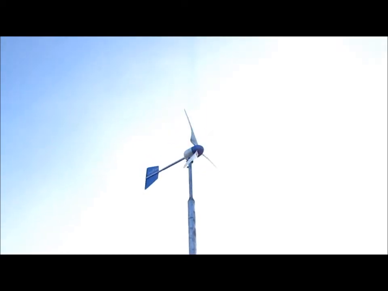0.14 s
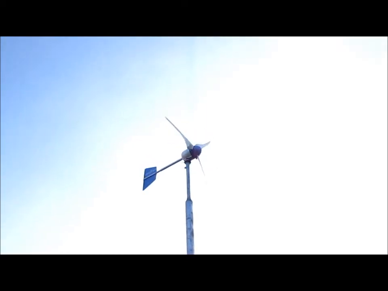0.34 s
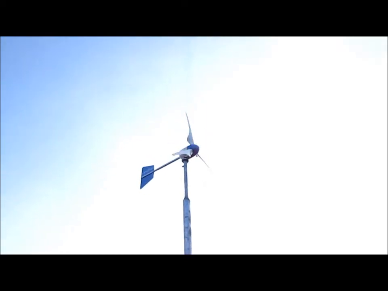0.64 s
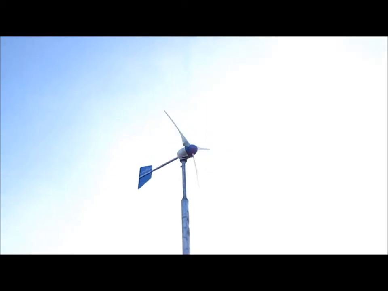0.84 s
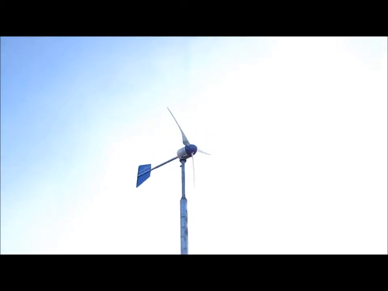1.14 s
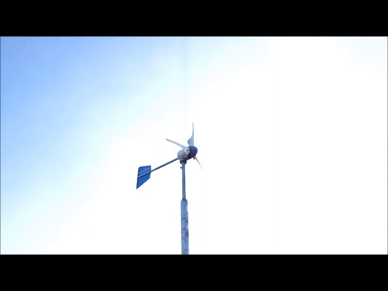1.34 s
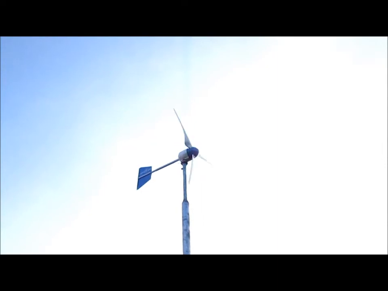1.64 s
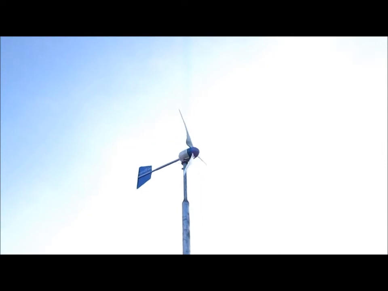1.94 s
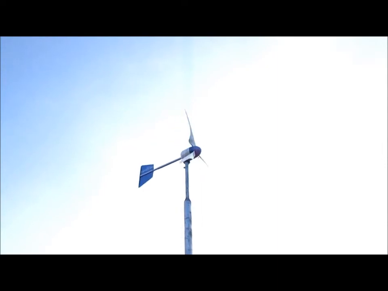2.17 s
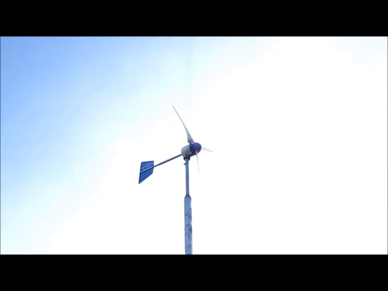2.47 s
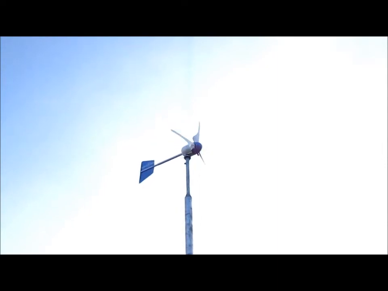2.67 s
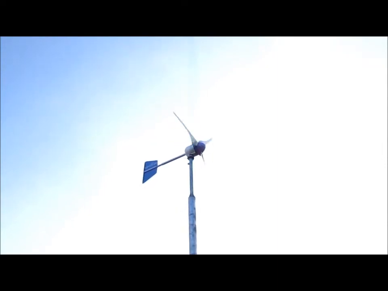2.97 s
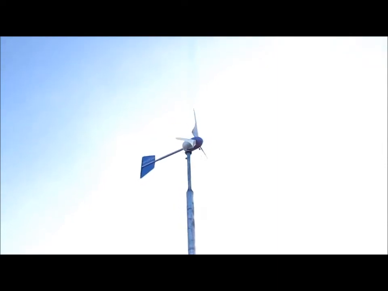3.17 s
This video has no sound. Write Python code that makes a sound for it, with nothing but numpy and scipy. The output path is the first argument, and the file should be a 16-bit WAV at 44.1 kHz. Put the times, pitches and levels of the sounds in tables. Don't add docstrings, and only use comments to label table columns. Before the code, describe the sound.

Gusty wind rumble batters an exposed microphone, with sharp slaps, small cracks and airy whoosh.

```python
import sys
import numpy as np
from scipy import signal
from scipy.fft import rfft, irfft, next_fast_len
from scipy.io import wavfile
from scipy.ndimage import uniform_filter1d, minimum_filter1d, map_coordinates

SR = 44100
rng = np.random.default_rng(int(sys.argv[2]) if len(sys.argv) > 2 else 0)


def voltage_ratio(level):
    return 10 ** (np.asarray(level, float) / 20)


def to_wav(s):
    ch = np.atleast_2d(s).T
    pcm = np.round(np.clip(ch, -1, 1) * 32767)
    wavfile.write(sys.argv[1], SR, pcm.astype(np.int16))


N = 145971

# time in seconds, level in dB, small eddies relative to large in dB,
# pitch of the small eddies in Hz.
GUSTS = [(0, -20.5, -7, 445), (.2, -20.5, -9, 560), (.4, -19.5, -11.5, 474), (.6, -16.5, -17, 417),
         (.8, -16.5, -17.5, 428), (.97, -19, -13, 457), (1.1, -16, -25, 421), (1.25, -19.5, -12.5, 438),
         (1.5, -16, -24.5, 451), (1.7, -13, -28, 415), (1.9, -17, -16.5, 476), (2.15, -17.5, -15, 393),
         (2.4, -15.5, -28, 378), (2.54, -12, -14, 493), (2.645, -21, -9, 800), (2.75, -19.5, -12.5, 560),
         (3.05, -17.5, -30, 370), (3.31, -19, -20.5, 440)]
# time in seconds, peak in dB, gain drop in dB
KICKS = [(0.0945, -25.5, 3.5), (0.157, -27.5, 0), (0.243, -31, -0.5), (0.3835, -27.5, -0.5),
         (0.4516, -26, 1.5), (0.7063, -33, 5), (0.867, -29, 4), (0.918, -39, 2), (0.9428, -33, 7),
         (1.202, -28, 2), (1.241, -25, 6), (1.346, -24, 2.5), (1.421, -41, -2.5), (1.459, -25.5, 1),
         (1.51, -37, 2.5), (1.5847, -26, 7.5), (1.8287, -25, 12), (1.8598, -25.5, -3), (2.3595, -17, 11),
         (2.5569, -14, 8), (2.6159, -30, 1.5), (2.725, -36, -1), (2.7585, -29, 4), (2.798, -18, 5.5),
         (3.025, -42, 1.5), (3.065, -26, 8), (3.2081, -25.5, 7.5)]
KICK_LATE_S = 0.0004


def unit(x):
    return x / np.sqrt(np.mean(x ** 2))


def walk(rate_hz):
    hold = int(SR / rate_hz)
    steps = np.repeat(rng.standard_normal(N // hold + 1), hold)
    smooth = uniform_filter1d(uniform_filter1d(steps, hold), hold)
    return unit(smooth[:N])


def shaped(gain, size):
    hz = np.arange(size // 2 + 1) * SR / size + 1e-3
    spectrum = rfft(rng.standard_normal(size)) * gain(hz)
    return unit(irfft(spectrum, size))


def swing_envelope(c, cycles):
    front_share = 0.4
    return np.exp(-(c / (cycles * np.where(c < 0, front_share, 1))) ** 2)


def whoosh(t):
    # frequency in Hz, density in dB per Hz.
    colour = [(880, -44.5), (1500, -10), (2070, -3.5), (2750, 1), (4190, -4.5), (4520, -2.5), (6330, -12.5),
              (9000, -27), (11700, -67)]
    # time in seconds, level in dB.
    swells = [(0, -49.5), (.15, -49.5), (.27, -55.5), (.37, -53.5), (.47, -54.5), (.62, -52), (.72, -54.5),
              (.85, -50.5), (.97, -47), (1.15, -47), (1.45, -51), (1.75, -48.5), (2.0, -53.5), (2.25, -50),
              (2.5, -46.5), (2.75, -55), (3.0, -49.5), (3.31, -47)]
    hz, db = np.array(colour).T
    low_db = -22.5

    def gain(f):
        level_db = np.interp(np.log(f), np.log(hz), db) + low_db * (f < hz[0])
        return voltage_ratio(level_db) * (f > 200) * (f < hz[-1])

    air = shaped(gain, size=next_fast_len(N))[:N]
    level_db = np.interp(t, *np.array(swells).T) + 0.8 * walk(9.0)
    return air * voltage_ratio(level_db)


def gain_db(t):
    start_drop_db, recover_s = 13, 0.16
    total_drop_db = np.zeros(N)
    for start, _, drop_db in [(0, 0, start_drop_db)] + list(KICKS):
        recovery = np.exp(-np.maximum(t - start, 0) / recover_s)
        total_drop_db += drop_db * (t > start + KICK_LATE_S) * recovery
    return -total_drop_db


def edge_pressure(t):
    # centre in seconds, pressure relative to full scale, half length in seconds.
    edge_swings = [
        (.0003, -.115, .0012),
        (3.31, -.27, .003),
    ]
    return sum(size * np.exp(-((t - centre) / half) ** 2) for centre, size, half in edge_swings)


def cracks(t):
    swing_hz, decay_s, level_db = 1370, 0.0002, 7
    out = np.zeros(N)
    for start, db, _ in KICKS:
        d = t - start - KICK_LATE_S
        corner_s = 0.00004 * voltage_ratio(-0.6 * (db + 20))
        envelope = np.exp(-np.hypot(d, corner_s) / decay_s)
        out += voltage_ratio(db + level_db) * envelope * np.cos(2 * np.pi * swing_hz * d - 1)
    return out


def gliding_swing(c):
    glide = -0.33
    turn = rng.random()
    return np.sin(2 * np.pi * (c + glide * c * np.tanh(c) / 2 + turn))


def slaps(t):
    # time in seconds, peak in dB, pitch in Hz.
    early_slaps = [(0.032, -14, 506), (0.07, -23, 474), (0.081, -14, 401), (0.112, -23, 441),
                   (0.139, -15, 479), (0.203, -28, 401), (0.202, -15.5, 396), (0.254, -12, 405),
                   (0.276, -27, 401), (0.32, -27.5, 480), (0.342, -24, 431), (0.354, -15.5, 401),
                   (0.367, -20.5, 584), (0.38, -15.5, 401), (0.409, -15, 607), (0.449, -25, 420),
                   (0.475, -19, 538), (0.513, -28, 560), (0.542, -13, 430), (0.569, -22, 390),
                   (0.57, -14.5, 540), (0.603, -18.5, 540), (0.637, -36, 401), (0.651, -15.5, 401),
                   (0.692, -21, 506), (0.705, -18, 570), (0.744, -19, 440), (0.79, -22, 393),
                   (0.809, -15, 730), (0.819, -15, 450), (0.865, -13, 401), (0.876, -24, 646),
                   (0.898, -18.5, 589), (0.918, -17, 581), (0.942, -13, 387), (0.962, -23.5, 416),
                   (0.989, -16, 397), (1.003, -18, 510), (1.055, -21.5, 433), (1.08, -17, 482),
                   (1.168, -20, 439), (1.193, -8.5, 445), (1.209, -9, 401), (1.238, -16, 420),
                   (1.283, -11.5, 525), (1.3, -17, 501), (1.343, -10.5, 646), (1.365, -24, 436),
                   (1.406, -23.5, 526), (1.423, -24.5, 471), (1.436, -18, 400), (1.458, -10, 404),
                   (1.509, -16.5, 401), (1.526, -22, 700), (1.542, -10, 487), (1.58, -16.5, 522),
                   (1.617, -21.5, 415), (1.671, -32, 530)]
    # time in seconds, peak in dB, pitch in Hz.
    later_slaps = [(1.671, -30, 404), (1.696, -16, 540), (1.721, -8.5, 520), (1.764, -16, 401),
                   (1.793, -14, 401), (1.829, -13, 408), (1.857, -4, 598), (1.897, -18.5, 401),
                   (1.898, -21, 401), (1.916, -21, 401), (1.945, -16, 730), (1.957, -25, 498),
                   (1.984, -21, 458), (2.004, -3, 401), (2.013, -17.5, 546), (2.077, -16.5, 444),
                   (2.11, -10.5, 413), (2.185, -15, 470), (2.234, -16, 455), (2.271, -27, 436),
                   (2.288, -18, 446), (2.31, -30, 397), (2.345, -22, 398), (2.351, -10.5, 401),
                   (2.358, -10, 406), (2.407, -23.5, 401), (2.435, -20, 401), (2.486, -26, 400),
                   (2.49, -20.5, 453), (2.511, -20, 474), (2.517, -27, 730), (2.553, 4, 538),
                   (2.594, -20, 401), (2.654, -14, 463), (2.7, -20, 455), (2.736, -13.5, 400),
                   (2.756, -12, 401), (2.781, -19, 396), (2.795, -15, 517), (2.839, -17, 401),
                   (2.856, -18, 560), (2.863, -17, 460), (2.897, -14, 401), (2.921, -21, 590),
                   (2.947, -20, 440), (2.973, -28, 401), (2.993, -35, 404), (3.009, -22, 436),
                   (3.026, -15, 610), (3.063, -15.5, 464), (3.083, -19, 452), (3.169, -24, 401),
                   (3.176, -19, 440), (3.203, -23, 430), (3.231, -7, 401), (3.25, -14.5, 605),
                   (3.289, -23, 400), (3.289, -16.5, 560)]
    # centre in seconds, peak in dB, pitch in Hz, half length in cycles.
    trains = [(1.196, -7, 340, 2), (1.302, -9.5, 810, 0.75), (1.346, -15, 724, 1.34), (1.462, -9, 750, 1.1),
              (1.582, -13.5, 530, 1.4), (2.08, -12, 850, 0.42), (2.189, -15, 474, 0.87),
              (2.296, -12, 268, 0.95), (2.3492, -26, 426, 1.6), (2.3593, -7, 980, 1.26),
              (2.61, -18.5, 1070, 0.69), (2.584, -15, 850, 1.4), (2.665, -19.5, 1150, 1.6),
              (2.711, -27, 885, 0.88), (3.184, -13.5, 301, 2.8), (3.205, -12, 820, 0.92),
              (3.253, -15.5, 584, 3.1)]
    late_s, slap_cycles, slap_db = 0.0019, 0.73, 6.5
    out = np.zeros(N)
    for start, db, hz in list(early_slaps) + list(later_slaps):
        c = (t - start - late_s) * hz
        out += voltage_ratio(db + slap_db) * swing_envelope(c, slap_cycles) * gliding_swing(c)
    for centre, db, hz, cycles in trains:
        c = (t - centre) * hz
        out += voltage_ratio(db) * np.exp(-(c / cycles) ** 2) * gliding_swing(c)
    return out


def small_eddies():
    per_s, half = 330, 300
    pitch_oct, cycles, scatter_db = 0.73, 0.72, 3.5
    clump_db, level_db = 4, 8
    count = int(per_s * N / SR)
    when, turn, size, pitch = rng.random((count, 4)).T[:, :, None]
    gust_s, _, _, gust_hz = np.array(GUSTS).T
    hz = np.interp(when * N / SR, gust_s, gust_hz) * 2 ** (pitch_oct * (2 * pitch - 1))
    c = np.arange(-half, half) / SR * hz
    strength = voltage_ratio(-scatter_db * np.log(1 - size))
    swings = strength * swing_envelope(c, cycles) * np.sin(2 * np.pi * (c + turn))
    place = (when * N).astype(int) + np.arange(2 * half)
    out = np.bincount(place.ravel(), swings.ravel(), N + 2 * half)[half:N + half]
    return unit(out * voltage_ratio(clump_db * walk(70.0))) * voltage_ratio(level_db)


def large_eddies():
    eddy_hz, slope, knee = 192.5, 2.8, 0.29
    db_per_oct, patchy_db, level_db = 3.5, 0.5, -1.5
    mic_cut_hz = 73

    def gain(f):
        ratio = f / eddy_hz
        return ratio ** knee / (1 + ratio ** (2 * slope)) ** 0.5

    speed_oct = 0.17 * walk(45.0) + 0.36 * walk(140.0)
    field = shaped(gain, size=2 ** 19)
    position = np.cumsum(2 ** speed_oct)
    heard = map_coordinates(field, [position], mode="wrap") * voltage_ratio(db_per_oct * speed_oct)
    high_pass = signal.butter(2, mic_cut_hz, "high", fs=SR, output="sos")
    heard = signal.sosfilt(high_pass, heard)
    return unit(heard * voltage_ratio(patchy_db * walk(30.0))) * voltage_ratio(level_db)


def eddies(t):
    # centre in seconds, half length in seconds, depth in dB.
    lulls = [(2.04, .018, 14), (.525, .012, 15), (1.04, .026, 18), (1.14, .028, 24), (1.4, .02, 10),
             (1.57, .007, 12), (1.645, .028, 30), (1.745, .012, 16), (2.17, .008, 9), (2.255, .016, 14),
             (2.335, .011, 14), (2.385, .02, 18), (2.425, .01, 14), (2.455, .02, 19), (2.83, .011, 12),
             (2.96, .025, 8), (3.05, .009, 12), (3.14, .022, 17), (2.88, .01, 10), (.775, .012, 9),
             (.495, .012, 7)]
    # centre in seconds, change in dB.
    heaves = [(0.171, -0.5), (.235, 4.5), (.44, 1.5), (0.341, 6.5), (0.731, -3.5), (0.901, 1), (1.02, 3),
              (1.179, 7), (1.37, -1), (1.53, 5), (1.68, -2.5), (1.78, -2), (2.17, 3.5), (2.27, 1),
              (2.34, -1), (2.521, 2.5), (2.63, 4.5), (2.72, 4), (2.79, 0), (3.058, 5), (3.181, 6),
              (3.23, 2)]
    stall, large_share, heave_s = 1.23, 0.63, 0.03
    gust_s, gust_db, bite_db, _ = np.array(GUSTS).T
    stall_db = stall * sum(db * np.exp(-((t - s) / half) ** 2) for s, half, db in lulls)
    heave_db = sum(db * np.exp(-((t - s) / heave_s) ** 2) for s, db in heaves)
    small = small_eddies() * voltage_ratio(np.interp(t, gust_s, bite_db) - stall_db)
    large = large_eddies() * voltage_ratio(heave_db - large_share * stall_db)
    return voltage_ratio(np.interp(t, gust_s, gust_db)) * (large + small)


def limit(x):
    ceiling, look_s = 0.47, 0.003
    k = int(look_s * SR)
    needed = np.minimum(1, ceiling / (np.abs(x) + 1e-9))
    held = minimum_filter1d(needed, size=2 * k)
    return x * uniform_filter1d(held, size=k)


def scene():
    wind_duck, mic_top_hz = 0.037, 1670
    t = np.arange(N) / SR
    duck_db = gain_db(t)
    wind = eddies(t) * voltage_ratio(wind_duck * (duck_db - duck_db.mean())) + slaps(t)
    low_pass = signal.butter(3, mic_top_hz, fs=SR, output="sos")
    wind = limit(signal.sosfilt(low_pass, wind))
    mix = wind + edge_pressure(t) + cracks(t) + whoosh(t) * voltage_ratio(duck_db)
    return mix[None]


def top_cut(x):
    return signal.sosfilt(signal.butter(12, 15710, fs=SR, output="sos"), x)


def record(dry):
    offset, hiss_db = 0.008, -66
    hiss = voltage_ratio(hiss_db) * rng.standard_normal(dry.shape)
    return top_cut(dry + offset + hiss)


dry = scene()
out = record(dry)
to_wav(out)
```